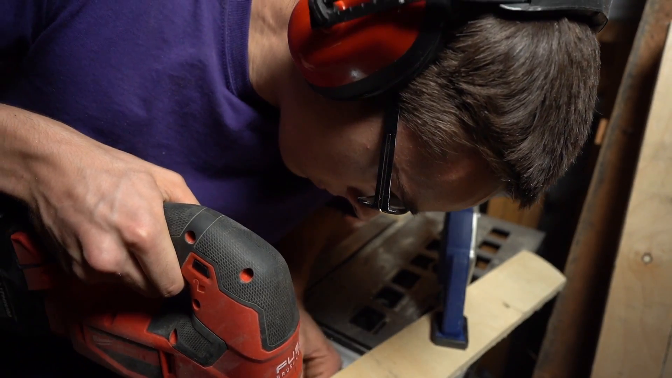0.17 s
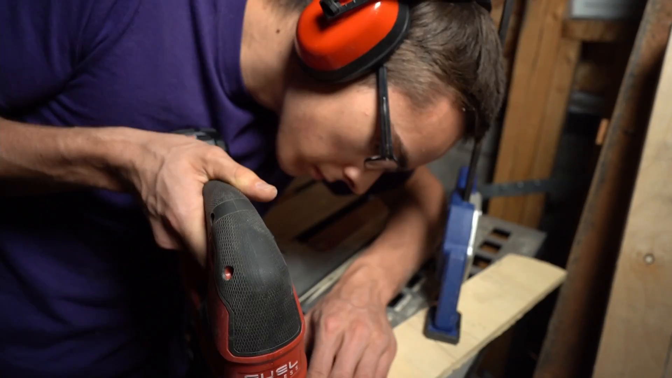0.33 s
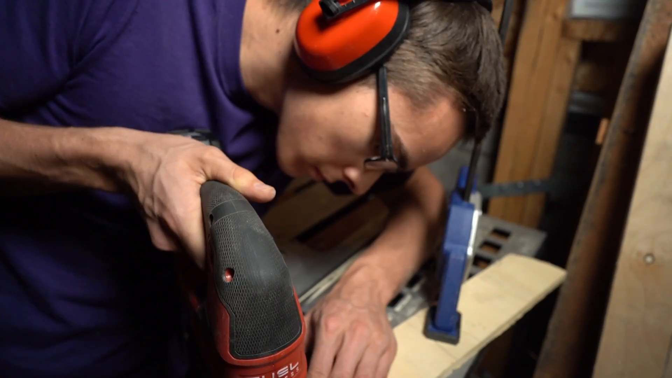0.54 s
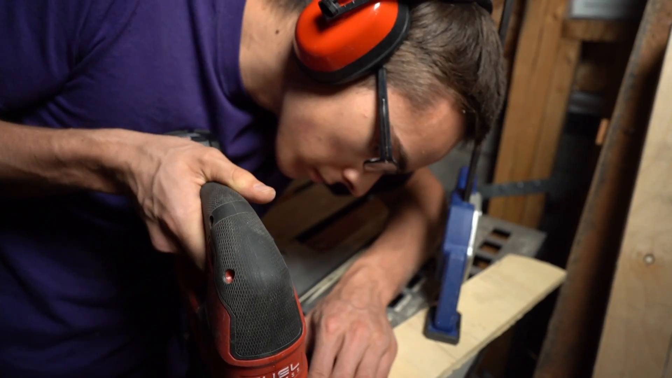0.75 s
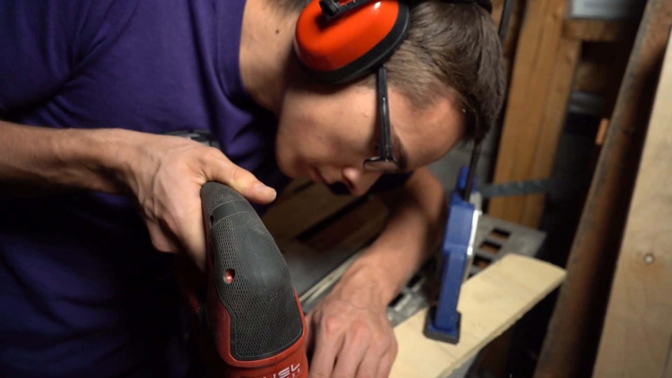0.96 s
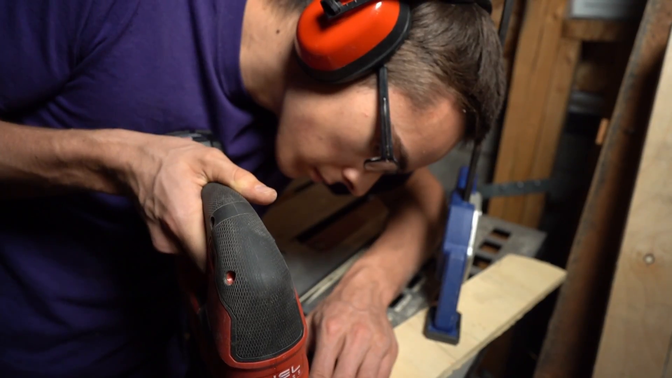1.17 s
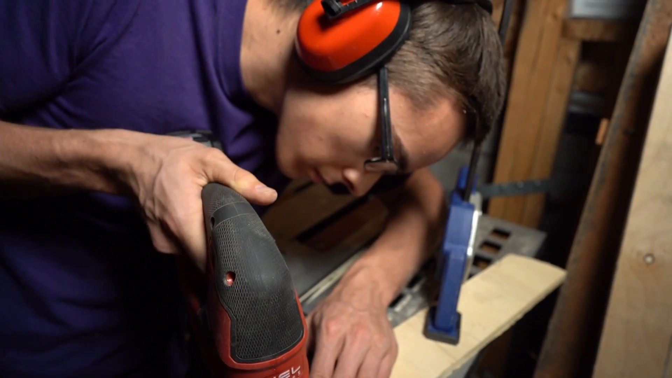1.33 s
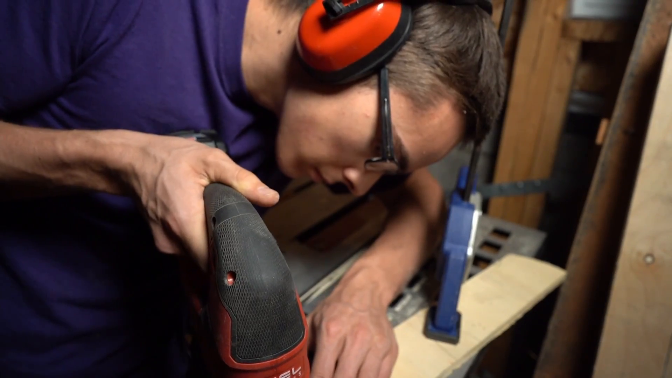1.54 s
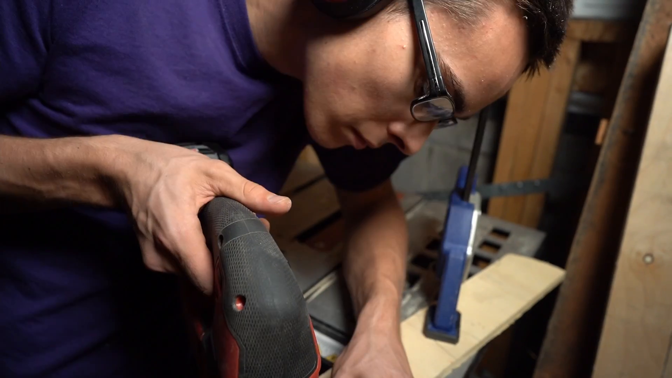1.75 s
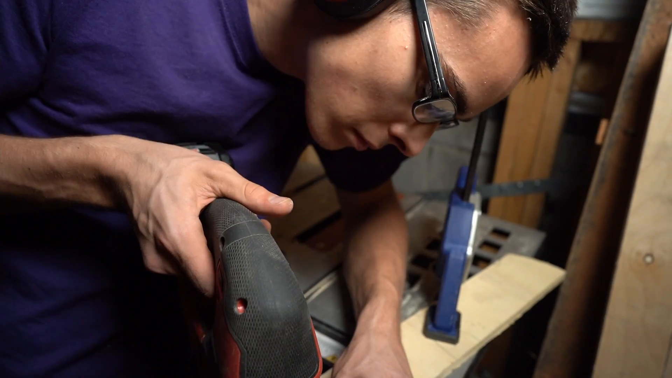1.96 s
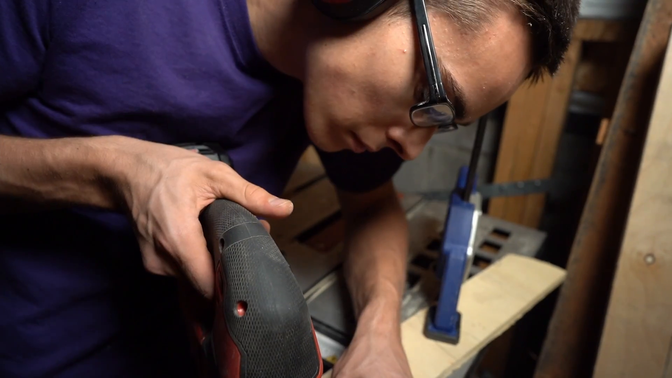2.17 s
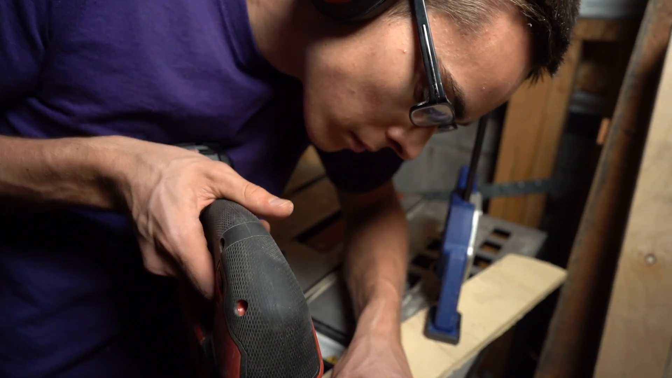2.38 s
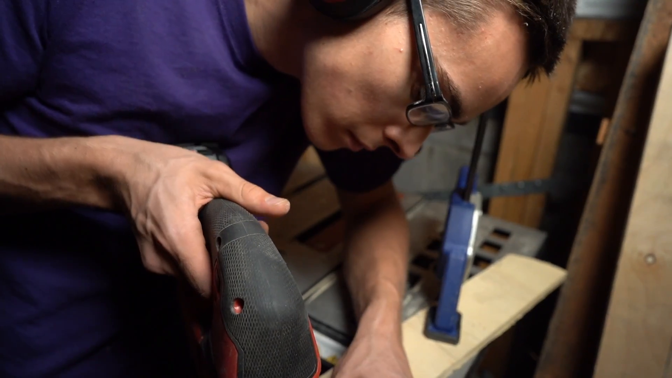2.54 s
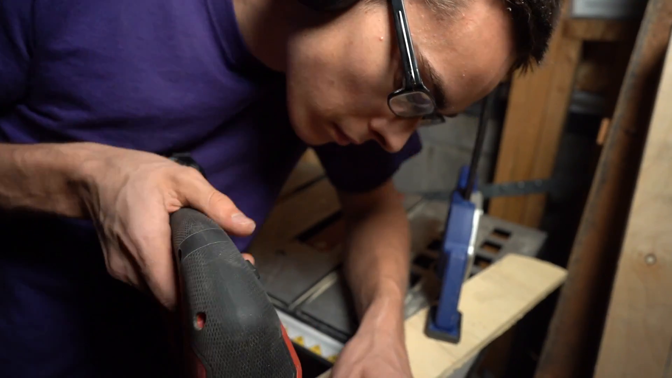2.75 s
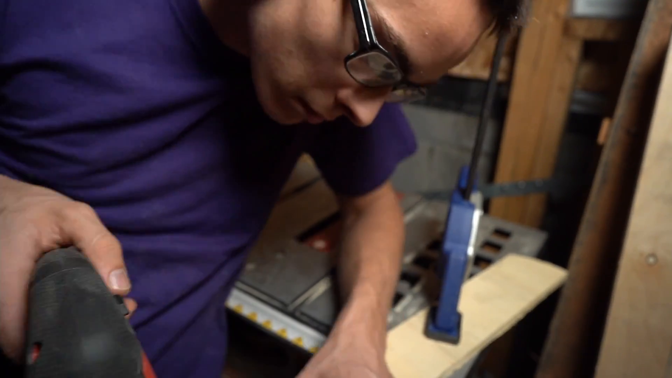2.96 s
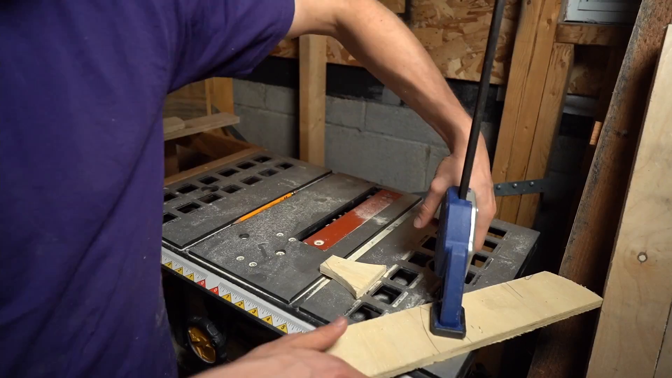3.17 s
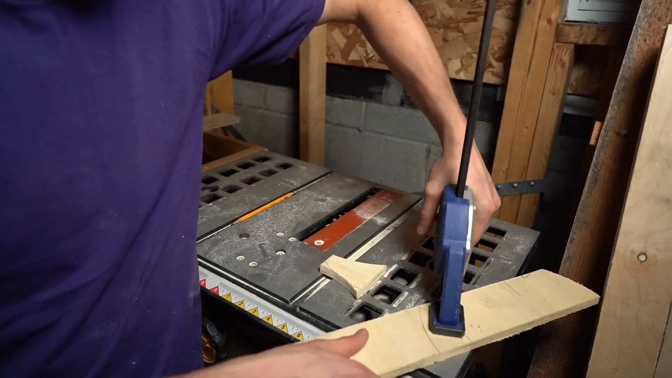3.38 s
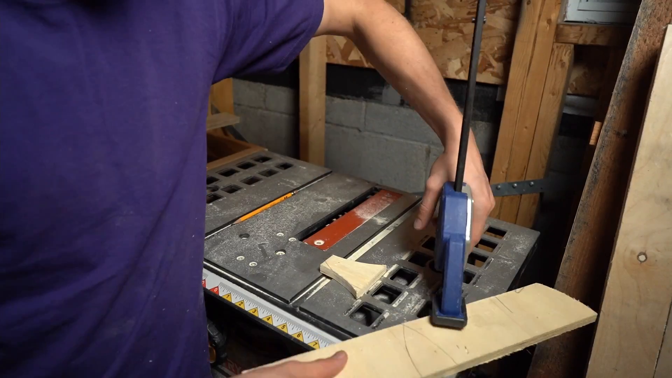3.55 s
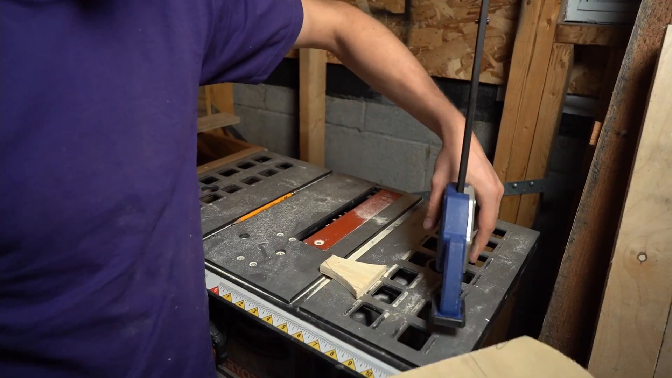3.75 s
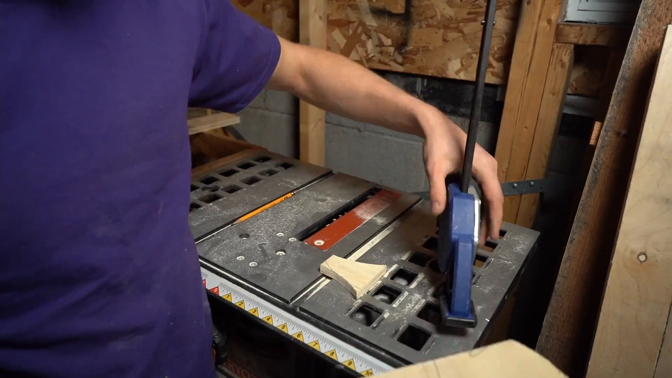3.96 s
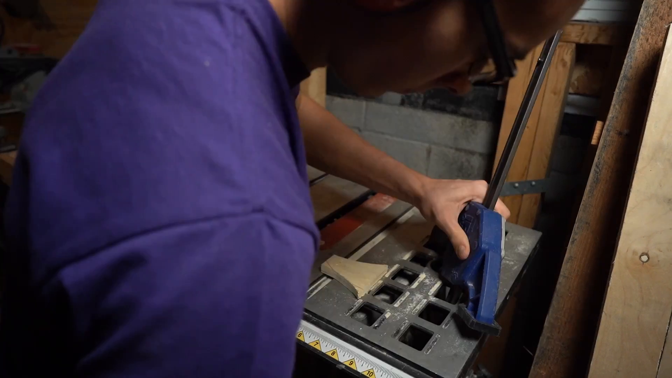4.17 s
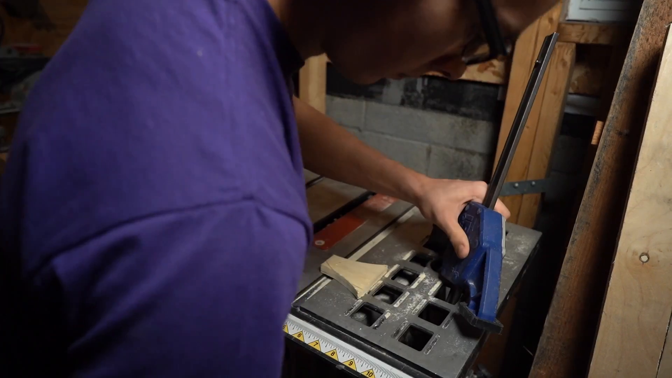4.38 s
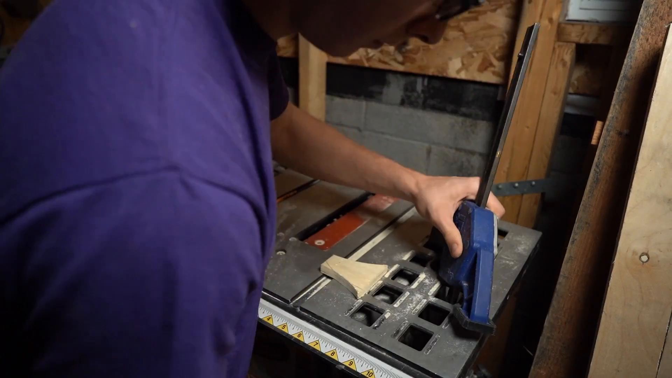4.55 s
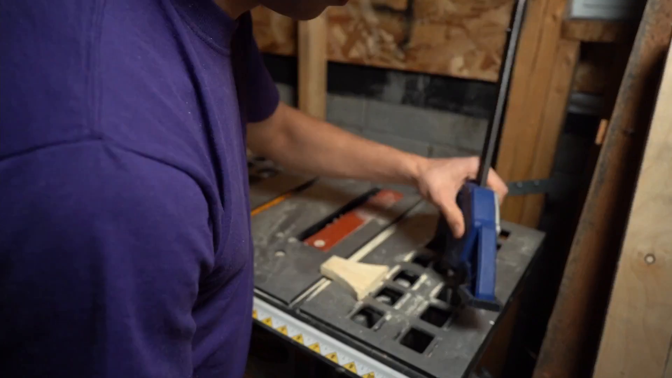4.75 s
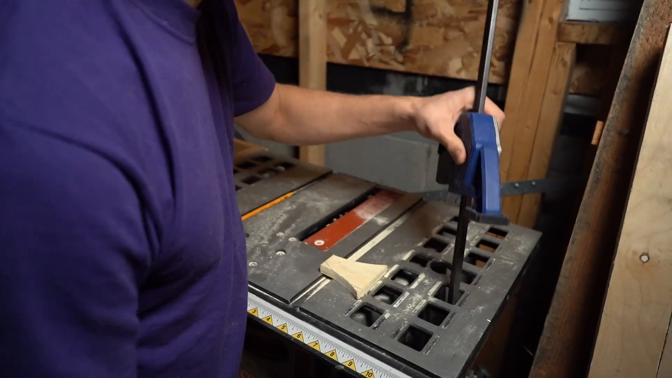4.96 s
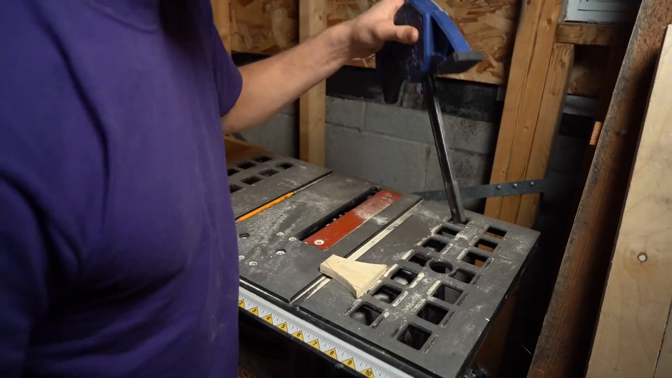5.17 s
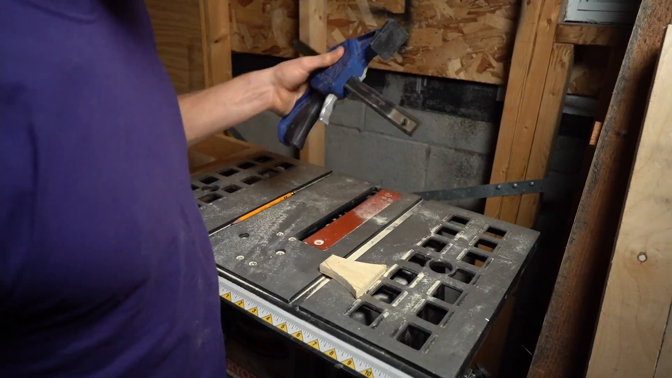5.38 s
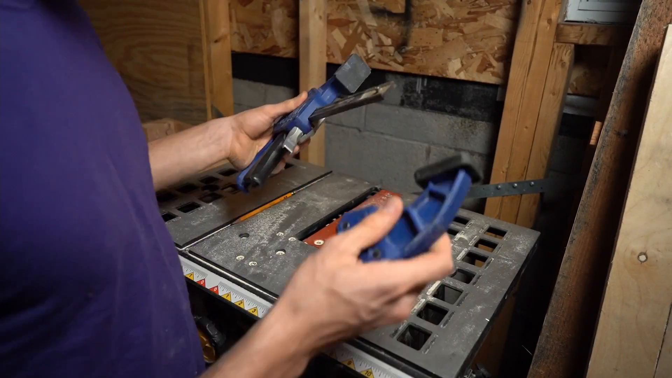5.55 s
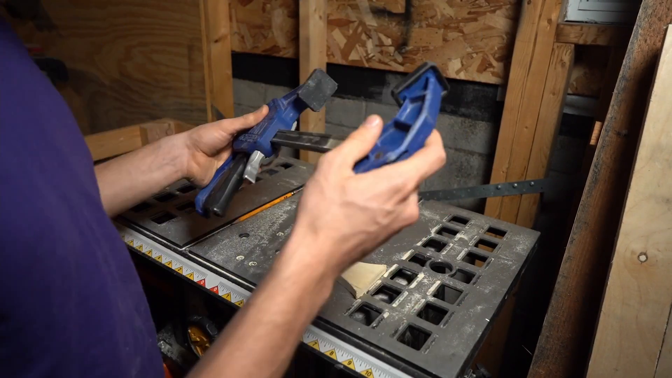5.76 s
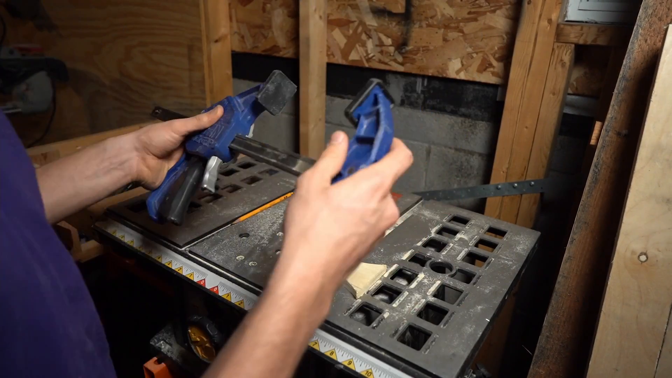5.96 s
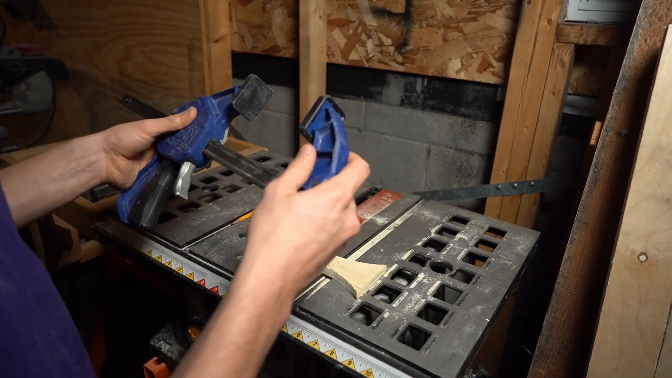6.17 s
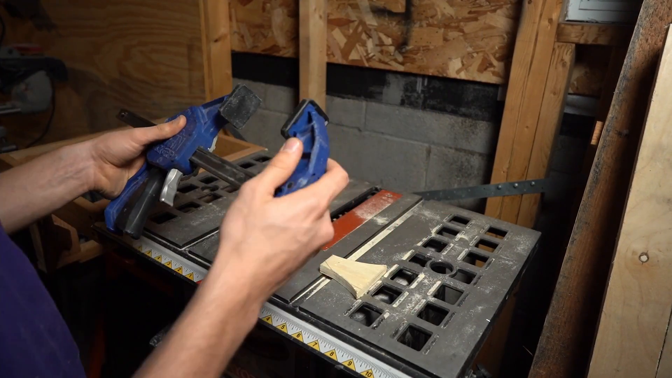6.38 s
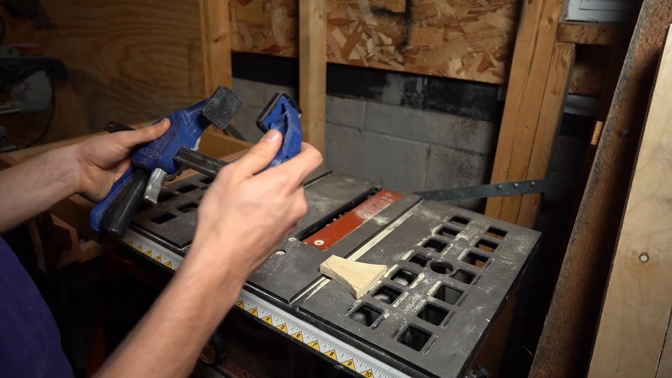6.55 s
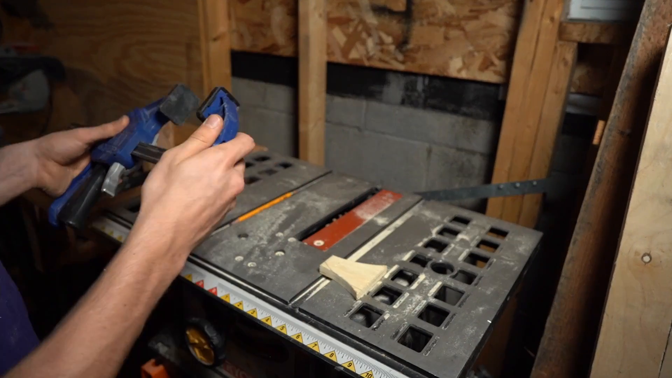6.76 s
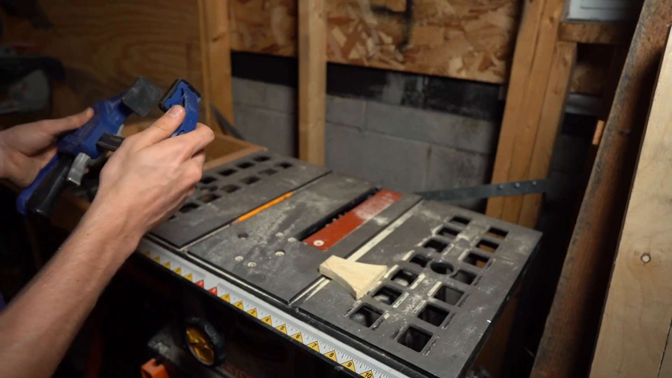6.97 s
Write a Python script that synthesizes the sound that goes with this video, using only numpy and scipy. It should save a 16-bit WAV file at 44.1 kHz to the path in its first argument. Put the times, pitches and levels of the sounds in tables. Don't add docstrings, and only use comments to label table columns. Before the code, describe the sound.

Very close and overloaded, a jigsaw grinds through wood with buzzing teeth, gear hum and a high motor whine. A looser cut follows, its blade squealing upward, then sagging as it lifts out. A bar clamp releases with sharp knocks and a steel ring, the board bumps the bench, the bar scrapes free and plastic jaws click. A small workshop echoes briefly over a low fan hum.

```python
import sys
import numpy as np
from scipy import signal
from scipy.fft import rfft, irfft, next_fast_len
from scipy.io import wavfile
from scipy.ndimage import uniform_filter1d

SR = 44100
rng = np.random.default_rng(int(sys.argv[2]) if len(sys.argv) > 2 else 0)


def invert_db(x):
    u = np.asarray(x, float) / 20
    return 10 ** u


def wav_record(signal):
    frames = np.transpose(np.atleast_2d(signal))
    bounded = np.clip(frames, -1, 1)
    quanta = np.round(bounded * 32767).astype(np.int16)
    wavfile.write(sys.argv[1], SR, quanta)


N = 309572
TIME = np.arange(N) / SR
CUT_END_S, LIFT_S = 1.662, 2.721


def evened(x):
    return x / np.sqrt(np.mean(x ** 2) + 1e-20)


def read(points, hz):
    f, value = np.transpose(points)
    return np.interp(np.log(hz + 1), np.log(f + 1), value)


def add(mix, start_s, sound):
    part = mix[round(start_s * SR):][:len(sound)]
    part += sound[:len(part)]


def ramp(t, start_s, length_s):
    return np.clip((t - start_s) / length_s, 0, 1)


def white(size):
    return rng.standard_normal(size)


def drift(size, samples):
    smooth = uniform_filter1d(white(size), int(samples))
    return evened(uniform_filter1d(smooth, int(samples)))


def coloured(x, points):
    size = next_fast_len(len(x))
    gain = invert_db(read(points, np.fft.rfftfreq(size, 1 / SR)))
    return evened(irfft(rfft(x, size) * gain, size)[:len(x)])


def resonate(x, hz, width_hz):
    pole = np.exp((2j * hz - width_hz) * np.pi / SR)
    return 2 * signal.lfilter([1 - abs(pole)], [1, -pole], x + 0j).real


def band(x, lo_hz, hi_hz):
    return signal.sosfilt(signal.butter(2, [lo_hz, min(hi_hz, 20000)], "band", fs=SR, output="sos"), x)


def tone(hz, level_db):
    return np.sqrt(2) * invert_db(level_db) * np.sin(2 * np.pi * (np.cumsum(hz) / SR + rng.random()))


def ring(hz, level_db, t60, later_s, later_db_per_s):
    t = np.arange(30000) / SR
    fall_db = 60 * t / t60 + later_db_per_s * np.maximum(t - later_s, 0)
    return tone(hz + 0 * t, level_db + 1.2 * drift(len(t), 300) - fall_db) * np.minimum(t / 0.0039, 1)


# pitch_hz, level_db
GEAR_TONES = [(296.1, -33), (387.6, -30.5), (414.5, -31.5), (473.7, -34.5), (597.5, -35), (716.0, -26.5),
              (775.2, -35), (834.4, -31.5), (1012, -28.5), (1071, -30), (1163, -28), (1308, -30.5),
              (1432, -34), (1486, -27.5), (1545, -31.5), (1669, -33), (1787, -27), (1846, -30.5),
              (2024, -37.5), (2083, -33), (2143, -31), (2202, -31), (2379, -28.5), (3155, -25),
              (3693, -25.5), (4280, -34), (5609, -44.5), (6185, -36)]
# pitch_hz, level_db (per Hz)
FIRST_CUT_COLOUR = [(15, -47.5), (30, -29), (200, -14.5), (293, -6), (400, -3), (600, -4.5), (720, 1),
                    (1900, 0), (3150, 1.5), (4100, -0.5), (4700, -8.5), (9300, -15.5), (14500, -24),
                    (16000, -31.5)]
# time_s, whine_rise_hz
EASINGS = [
    (.2, 45),
    (.52, 25),
    (.72, 70),
    (1.2, 55),
    (1.37, 45),
    (1.62, 70),
]


def first_cut():
    t = np.arange(0, CUT_END_S, 1 / SR)
    ease_s, reload_s = 0.11, 0.097
    whine_hz = 9275 + sum(hz * (ramp(t, s - ease_s, ease_s) - ramp(t, s, reload_s)) for s, hz in EASINGS)
    strokes = np.cumsum(whine_hz) / (6.5 * 24 * SR)
    bite = 1 + 0.16 * np.cos(2 * np.pi * strokes) + 0.11 * drift(len(t), 150)
    rasp = invert_db(-8.5) * coloured(white(len(t)), FIRST_CUT_COLOUR) * bite
    rasp += invert_db(-29) * evened(resonate(rasp, 3140, 130))
    pattern = white(1482)
    repeat = np.interp(strokes / 2 % 1 * 1481, np.arange(1482), pattern)
    repeat = invert_db(-13) * coloured(repeat, FIRST_CUT_COLOUR)
    strokes_per_s = np.gradient(strokes) * SR
    gears = 0
    for hz, db in GEAR_TONES:
        multiple = round(2 * hz / 59.5) / 2
        level_db = db + 4.5 - 2.2 * np.log2(hz / 700) + 0.53 * drift(len(t), 1500)
        gears = gears + tone(strokes_per_s * multiple, level_db)
    whine = tone(whine_hz * (1 + 0.0006 * drift(len(t), 400)), -30 + 1.8 * drift(len(t), 500))
    out = np.zeros(N)
    add(out, 0, (rasp + repeat + gears + whine) * invert_db(2.5))
    return out


# pitch_hz, level_db (per Hz)
SECOND_CUT_COLOUR = [(15, -48), (30, -42), (195, -15.5), (440, -4.5), (640, -5.5), (1100, -2.5),
                     (2100, -2.5), (2900, -2), (3400, -1.5), (4050, -3.5), (4700, -12.5), (7900, -18),
                     (14800, -29.5), (16000, -38)]


def second_rasp():
    t = np.arange(CUT_END_S, LIFT_S + 0.02, 1 / SR)
    stroke_hz, ease_off_s = 69, 2.587
    level_db = -0.5 - 7.5 * (1 - ramp(t, 1.56, 0.36)) - 9 * ramp(t, ease_off_s, LIFT_S - ease_off_s)
    level_db -= 1500 * np.maximum(t - LIFT_S, 0)
    strokes = sum(np.cos(2 * np.pi * k * stroke_hz * t) for k in (1, 2))
    rasp = coloured(white(len(t)) * (1 + 0.12 * drift(len(t), 200) + 0.13 * strokes), SECOND_CUT_COLOUR)
    low = band(rasp, 20, 1000)
    tilt_db = -3.5 * ramp(t, LIFT_S - 0.015, 0.009)
    return invert_db(level_db - 5.5) * (low * invert_db(-tilt_db) + (rasp - low) * invert_db(tilt_db))


# time_s, pitch_hz, level_db
SPIN_UP = [
    (1.665, 8700, -31),
    (1.75, 8810, -35.5),
    (1.85, 8700, -35),
    (1.92, 9000, -37.5),
]


def motor_spin_up():
    time_s, pitch_hz, level_db = np.transpose(SPIN_UP)
    t = np.arange(time_s[0], time_s[-1], 1 / SR)
    whine = tone(np.interp(t, time_s, pitch_hz), np.interp(t, time_s, level_db))
    return t[0], whine * signal.windows.tukey(len(t), 0.2)


def blade_squeal():
    start_s, top_s, low_hz, top_hz = 1.86, 2.37, 2445, 2652
    ease_off_s = 2.587
    t = np.arange(start_s, LIFT_S, 1 / SR)
    sag_hz = np.where(t < top_s, 800, 3100) * (t - top_s) ** 2
    tight = np.maximum(1 - sag_hz / (top_hz - low_hz), 0)
    fade_db = 1.2 * -9 * ramp(t, ease_off_s, LIFT_S - ease_off_s)
    level_db = -15 - 3.5 * tight ** 3 + fade_db
    third_db = -32 + 5.5 * tight + fade_db
    hz = (low_hz + (top_hz - low_hz) * tight) * (1 + 0.004 * drift(len(t), 250))
    squeal = tone(hz, level_db + 2.2 * drift(len(t), 400))
    squeal += tone(3 * uniform_filter1d(hz, 2000), third_db + 1.5 * drift(len(t), 500))
    return start_s, squeal * signal.windows.tukey(len(t), 0.14)


def second_cut():
    out = np.zeros(N)
    add(out, CUT_END_S, second_rasp())
    add(out, *motor_spin_up())
    add(out, *blade_squeal())
    return out


def hit(row, rattle_s, body, thud_hz, thud_s, body_db, spread, lo_hz, top_hz, blur):
    start_s, peak_db, hz, thud_db, tick_db = row
    t = np.arange(16000) / SR
    noise = white((3, len(t))) * np.minimum(t / 0.00078, 1)
    shift = rng.uniform(1.0, 1.05, len(body))
    rattle = invert_db(-60 * t / max(rattle_s, 0.01))
    blow = noise[0] * (0.5 * rattle + invert_db(-60 * t / 0.014))
    modes = sum(invert_db(db) * evened(resonate(blow, f * k, w * spread)) for (f, w, db), k in zip(body, shift))
    main = 0.66 * evened(resonate(blow, hz, 80 + blur * hz)) + invert_db(body_db) * evened(modes)
    main += 0.49 * evened(band(blow, lo_hz, np.clip(3.4 * hz, 1400, 3700)))
    main = band(band(main, 150, 5600), 150, 5200)
    push = noise[1] * invert_db(-60 * t / thud_s)
    low = evened(band(band(push, 210, 573), 200, 870))
    low += 0.4 * evened(resonate(resonate(push, thud_hz, 50), thud_hz, 50))
    tick = noise[2] * (invert_db(-60 * t / 0.0082) + 0.12 * rattle)
    tick = band(band(tick, 3300, top_hz), 3500, 15000)
    main, low, tick = (v / abs(v).max() for v in (main, low, tick))
    return start_s, invert_db(peak_db) * (main + invert_db(thud_db) * low + invert_db(tick_db) * tick)


# start_s, peak_db, pitch_hz, thud_db, tick_db (last two against the peak)
BOARD_HITS = [(2.83, -27.5, 1440, -29, -26), (2.866, -26.5, 1430, -23, -18), (3.083, -36.5, 887, -7, -18),
              (3.187, -26, 2290, -19, -14), (3.203, -21, 2000, -13, -14), (3.26, -2, 910, -10.5, -6.5),
              (3.275, -15, 800, -12.5, -28.5), (3.333, -20, 1550, -1, -7), (3.342, -17, 1550, -7.5, -6),
              (3.379, -10, 1900, -28.5, -24.5), (3.383, -9, 1370, -28, -28),
              (3.39, -14.5, 1500, -27.5, -17), (3.457, 5.5, 3000, -15, -21), (3.466, 1.5, 2200, -11, -19.5),
              (3.53, 1.5, 2650, -13, -22), (3.545, -4, 1290, -12, -26), (3.844, -26, 603, 2, -25)]
BENCH_HITS = [(4.354, -24.5, 3000, -9, -5.5), (4.378, -18, 520, 2, -14), (4.448, -24, 1200, -12, -27),
              (4.46, -16.5, 2750, -8.5, -8.5), (4.539, -21.5, 1430, -12, -16), (4.554, -18.5, 3500, -5, -6),
              (4.631, -8.5, 3600, -2.5, -10.5), (4.699, -21.5, 3470, -0.5, -8),
              (4.797, -15.5, 3470, -22, -18), (4.801, 3.5, 2270, -14, -13), (4.812, -11.5, 910, -5.5, -19),
              (4.931, -9, 1950, -20, -10), (4.944, -19, 2300, -13, -12), (4.971, -15.5, 3400, -15, -12),
              (4.985, -20, 3400, -11, -15), (5.018, -20, 2500, -20, -8), (5.071, -19, 3500, -18, -10),
              (5.082, -17, 3700, -20, -10), (5.1, -21.5, 1510, -22, -14), (5.34, -32, 2610, -3, -19)]
JAW_HITS = [(5.739, -1, 1830, -34, -22), (5.743, -4, 3180, -29, -17), (5.747, -12.5, 1320, -37, -22),
            (5.786, -23.5, 3520, -22, -19), (5.96, -33, 1100, -14, -32), (6.005, -28, 1030, -11, -30),
            (6.017, -17.5, 3220, -33, -29), (6.028, -21, 3000, -33, -29), (6.033, -11, 3250, -38, -19),
            (6.068, -29, 900, -16, -28), (6.073, -12, 1800, -17.5, -26), (6.081, -20, 3500, -23, -7),
            (6.088, -12, 2530, -36, -16), (6.199, -33.5, 1290, -12, -28), (6.417, -19.5, 1810, -22, -32),
            (6.651, -42, 1004, -5, -30), (6.698, -34, 3220, -11, -21), (6.744, -13, 3260, -37, -19),
            (6.817, -31, 900, -6, -36)]
# pitch_hz, width_hz, level_db
BOARD = [(320, 14, 9.5), (587, 47, 23), (724, 18, -0.5), (1650, 110, -23), (2320, 29, -25.5),
         (3380, 93, 17), (4340, 44, -42.5), (4855, 82, -42)]
BENCH = [(504, 17, -13.5), (990, 53, 2), (1670, 47, -5.5), (2140, 49, -2.5), (3140, 160, -7),
         (3430, 120, -20), (3600, 24, -0.5), (4520, 40, -40.5)]
JAWS = [(1480, 33, 4), (1763, 43, -7), (2165, 23, 3), (2410, 21, 4), (3120, 36, 33), (3740, 24.1, -5),
        (5270, 33, -41.5)]


def knocks():
    out = np.zeros(N)
    for row in BOARD_HITS:
        add(out, *hit(row, 0.12, BOARD, thud_hz=170, thud_s=0.2, body_db=-5, spread=3.5,
                      lo_hz=600, top_hz=11000, blur=0.26))
    for row in BENCH_HITS:
        add(out, *hit(row, 0.13, BENCH, thud_hz=135, thud_s=0.25, body_db=-3, spread=2.5,
                      lo_hz=600, top_hz=8500, blur=0.26))
    for row in JAW_HITS:
        add(out, *hit(row, 0.055, JAWS, thud_hz=400, thud_s=0.08, body_db=-12, spread=9,
                      lo_hz=550, top_hz=12000, blur=0.42))
    return out


# pitch_hz, level_db, free_t60_s, gripped_t60_s
STEEL = [(280, -19, .6, .3), (1050, -19, .25, .2), (1677, -15, 2, .09), (2135, -14, .06, .03),
         (2552, -31, 1.0, .7), (3030, -14, .06, .03), (6720, -39, .25, .1)]
# start_s, pitch_hz, level_db, t60_s
TINKS = [
    (2.83, 1440, -46, .2),
    (2.85, 6000, -56, .15),
    (3.532, 2552, -29, .72),
    (3.53, 3700, -20, .05),
    (3.53, 3690, -42, .5),
    (3.844, 1380, -42, .12),
    (4.802, 2190, -8, .035),
    (5.05, 1420, -45, .5),
]


def steel_bar():
    release_s, grip_s = 3.458, 3.535
    out = np.zeros(N)
    for hz, db, free, gripped in STEEL:
        add(out, release_s, ring(hz, db, free, grip_s - release_s, 60 / gripped - 60 / free))
    for start_s, hz, db, t60 in TINKS:
        add(out, start_s, ring(hz, db, t60, 0, 0))
    return out


# pitch_hz, level_db
SPRING = [(5200, -40), (7220, -46), (8380, -46), (9600, -51), (11200, -50.5), (12300, -49), (14000, -51),
          (15350, -56)]


def clamp_spring():
    out = np.zeros(N)
    for hz, db in SPRING:
        add(out, 3.341, ring(hz, db, 0.14, 0, 0))
    return out


# start_s, pitch_hz, level_db, free_for_s
PLANK = [(3.262, 572, -17, 0.015), (3.262, 734, -18.5, 0.019), (3.264, 385, -21, .026),
         (3.29, 279.7, -24.5, 0.09), (3.53, 504, -14, 0.027), (3.563, 506, -13.5, .012),
         (3.534, 541, -31, 0.13), (3.844, 522, -28, 0.016), (4.378, 177, -29.5, 0.098),
         (4.807, 983, -21.5, 0.012), (4.844, 994, -24, .008), (4.826, 530, -18.5, 0.018),
         (4.938, 549, -28.5, 0.028), (4.978, 535, -26.5, .025), (5.08, 527, -33, .02)]


def plank():
    out = np.zeros(N)
    for start_s, hz, db, free_s in PLANK:
        add(out, start_s, ring(hz, db, 0.37, free_s, later_db_per_s=498))
    return out


# pitch_hz, level_db (per Hz)
RUB_COLOUR = [(180, -63), (300, -27.5), (334, -20.5), (437, -17), (528, -2.5), (701, -14), (835, -7.5),
              (1110, -1), (1410, -4), (2770, -8.5), (3530, -3), (4040, -7.5), (7500, -22.5), (9750, -41.5),
              (16500, -120)]
# pitch_hz, level_db (per Hz)
HISS_COLOUR = [(4120, -33), (7000, 0), (9790, -7), (10900, -12.5), (13000, -7.5), (14900, -13),
               (16000, -29.5)]
# pitch_hz, width_hz, level_db
BAR_SINGING = [(1430, 40, -5.5), (1830, 35, -2.5), (2290, 45, -7.5), (3250, 60, -7), (3540, 38, 6),
               (3960, 70, -5), (4450, 49, 3), (4700, 40, -15), (5670, 50, -4), (6300, 40, -4),
               (6900, 50, -10), (7800, 60, -14)]


def rub(level_db, hiss_db, steel_db, grain_db):
    size = len(level_db)
    grit = white((2, size)) * invert_db(grain_db * drift(size, 60))
    sound = coloured(grit[0], RUB_COLOUR)
    sound += invert_db(hiss_db) * coloured(grit[1] * invert_db(grain_db * drift(size, 300)), HISS_COLOUR)
    singing = sum(invert_db(db + 6.3 * drift(size, 600)) * evened(resonate(grit[0], f, w)) for f, w, db in BAR_SINGING)
    sound += invert_db(steel_db) * evened(singing)
    return invert_db(level_db - 5.5) * sound * signal.windows.tukey(size, 0.1)


# loudest_s, rise_s, fall_s, level_db, hiss_db (against the level)
RUBS = [(2.861, 0.087, 0.024, -43, -16), (3.071, 0.077, 0.11, -46.5, -10), (3.35, 0.029, 0.024, -21.5, -18),
        (3.39, 0.015, 0.048, -22.5, -19), (3.45, 0.02, 0.016, -29, -16), (3.5, 0.036, .04, -17.5, -22),
        (3.57, .04, 0.11, -25, -32), (3.69, 0.029, 0.036, -40, -3.5), (3.745, 0.048, 0.054, -45.5, -8),
        (4.195, 0.058, 0.01, -40.5, -6), (4.31, 0.07, .04, -50.5, -11), (4.548, 0.054, 0.11, -38, -15),
        (4.699, 0.056, 0.052, -24.5, -17), (4.79, 0.013, 0.0091, -40, -11), (5.34, 0.035, 0.037, -48, -10),
        (5.43, .12, 0.098, -49.5, -9), (6.0, 0.061, 0.027, -43, -13), (6.09, 0.064, 0.0073, -25, -33),
        (6.15, 0.085, 0.068, -52, -7), (6.582, .02, .04, -51, -23), (6.77, 0.055, 0.063, -37.5, -12),
        (6.99, 0.044, 0.093, -49.5, -17)]


def scuffs():
    out = np.zeros(N)
    for loudest_s, rise, fall, level_db, hiss_db in RUBS:
        t = np.arange(-rise, fall, 1 / SR)
        swell_db = -16.5 * np.where(t < 0, t / rise, t / fall) ** 2
        add(out, loudest_s - rise, rub(level_db + swell_db, hiss_db, steel_db=-22.5, grain_db=2.5))
    return out


def bar_slide():
    start_s, full_s, stop_s = 4.83, 4.964, 5.108
    t = np.arange(start_s, stop_s + 0.091, 1 / SR)
    pull_db = -12 * (1 - ramp(t, start_s, full_s - start_s)) - 600 * np.maximum(t - stop_s, 0)
    out = np.zeros(N)
    add(out, start_s, rub(-24.5 + pull_db, hiss_db=-7, steel_db=1.0, grain_db=3.0))
    return out


def handling():
    return knocks() + steel_bar() + clamp_spring() + plank() + scuffs() + bar_slide()


def bench_shake(near):
    loudness = np.sqrt(abs(uniform_filter1d(near ** 2, 9000)))
    return invert_db(-32.5) * loudness * evened(band(white(N), 30, 110))


# pitch_hz, t60_s
ROOM = [(150, 0.52), (600, 0.4), (2500, 0.3), (6000, 0.24), (14000, 0.14)]


def room():
    taps = np.zeros(SR // 2)
    at = np.arange(200, SR // 2 - 20, 20)
    taps[at + rng.integers(0, 20, len(at))] = rng.choice([-1., 1.], len(at))
    hz, t, z = signal.stft(taps, SR, nperseg=256)
    tail = signal.istft(z * invert_db(-60 * t / read(ROOM, hz)[:, None]), SR, nperseg=256)[1]
    return tail / np.linalg.norm(tail)


# pitch_hz, level_db (per Hz)
FAN_COLOUR = [(15, -59), (25, -4.5), (43, -25), (102, -8), (195, -15), (217, -12.5), (317, -12), (373, -30),
              (516, -22), (560, -20), (677, -30.5), (887, -22.5), (1190, -31), (4490, -50), (16000, -58)]
# pitch_hz, width_hz, level_db
HUM = [(322.7, 28, -47), (576, 17, -62.5), (880, 30, -59), (3600, 1100, -67.5)]


def fan():
    air = invert_db(-37.5 - 7.5 + 0.73 * drift(N, 3000)) * coloured(white(N), FAN_COLOUR)
    rumble_db = -49.5 - 15 * np.exp(-np.maximum(TIME - LIFT_S, 0) / 0.33)
    rumble_db += 2 * (TIME > 3.9)
    low = coloured(band(air, 60, 130), [(60, -11.0), (105, -4.0), (150, 2.0), (210, -14.0)])
    out = band(air, 210, 18000) + low * invert_db(rumble_db) + 0.9 * band(air, 42, 80)
    noise = white(N)
    for hz, width, db in HUM:
        out += invert_db(db + 2.0 * drift(N, 2000)) * evened(resonate(resonate(noise, hz, width), hz, width))
    return out


def scene():
    first, second, near = first_cut(), second_cut(), handling()
    echo = signal.fftconvolve(invert_db(-14.5) * second + invert_db(-12.5) * near, room())[:N]
    mono = invert_db(-0.5) * (first + second) + near + echo + bench_shake(near) + fan()
    return np.array([mono, mono])


def overload(x):
    keep = np.exp(-1 / (0.0037 * SR))
    recent = signal.lfilter([1 - keep], [1, -keep], np.minimum(abs(x), 1))
    ceiling = np.maximum(0.51, 1 - 1.2 * recent)
    return np.clip(x, -ceiling, ceiling)


def roll_off(x):
    return signal.sosfilt(signal.butter(12, 16960, fs=SR, output="sos"), x)


def record(dry):
    edge = signal.firwin(301, 15850, window=("kaiser", 8), fs=SR)
    mono = signal.oaconvolve(overload(dry[0]), edge, "same")
    mix = np.clip([mono, mono], -1, 1)
    return roll_off(mix)


dry = scene()
out = record(dry)
wav_record(out)
```